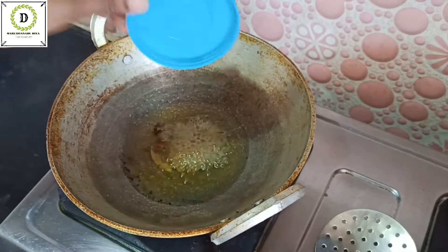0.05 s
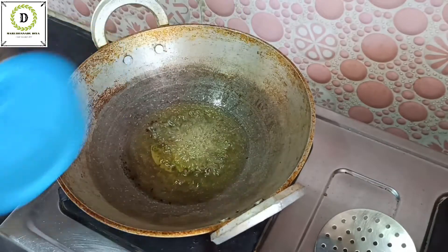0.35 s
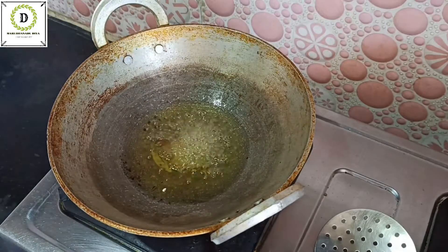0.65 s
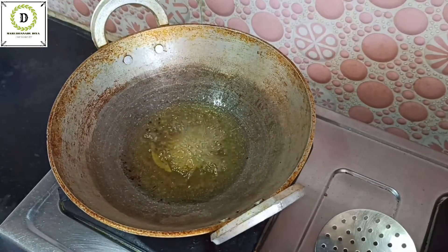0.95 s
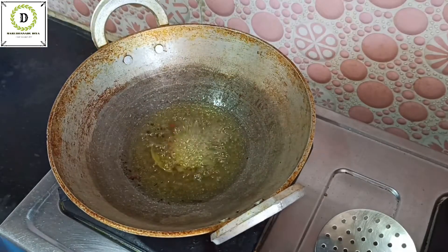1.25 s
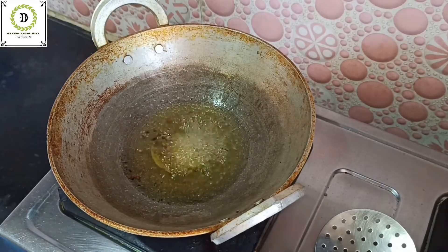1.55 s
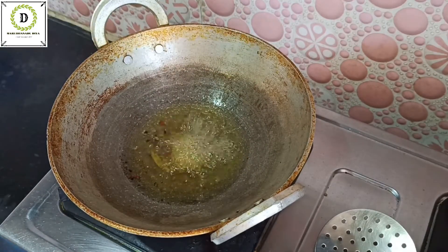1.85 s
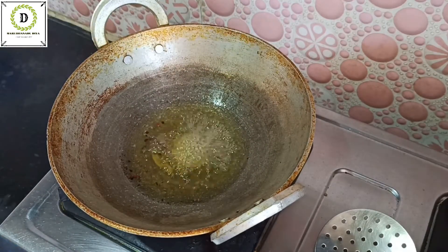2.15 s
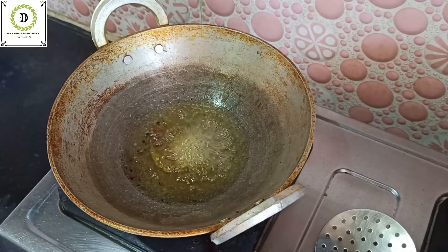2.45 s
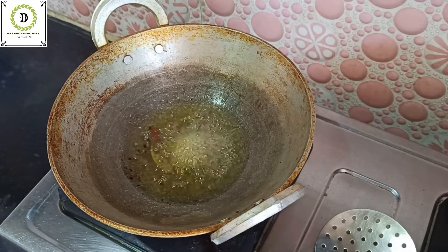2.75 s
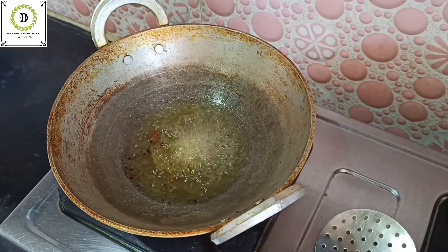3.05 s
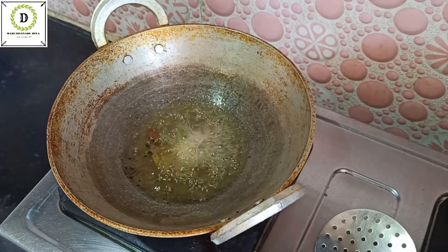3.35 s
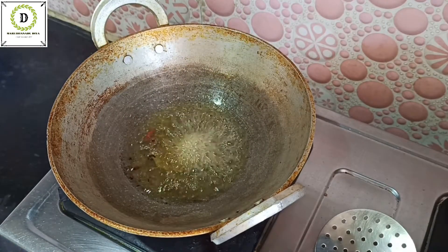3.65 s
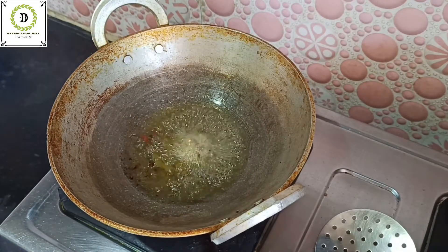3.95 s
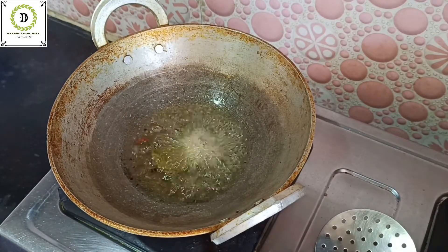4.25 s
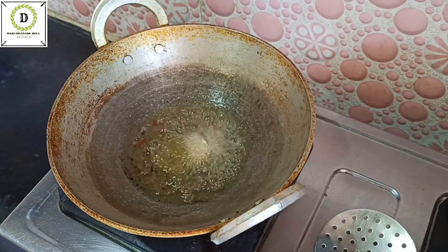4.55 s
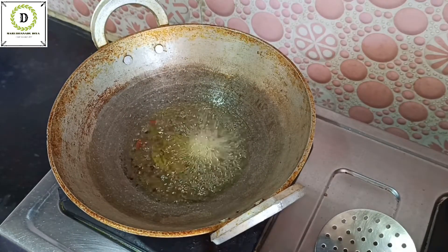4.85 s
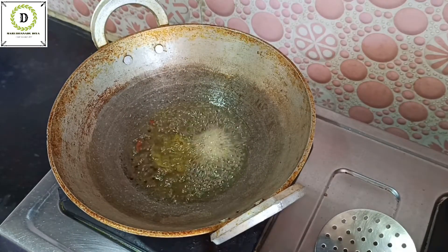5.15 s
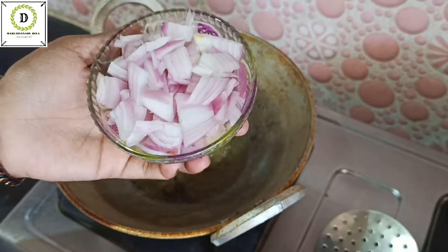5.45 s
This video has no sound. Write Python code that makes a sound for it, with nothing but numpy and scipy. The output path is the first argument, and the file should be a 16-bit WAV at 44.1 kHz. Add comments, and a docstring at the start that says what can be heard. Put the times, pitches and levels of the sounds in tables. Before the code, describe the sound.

Seeds and lentils fry in a little hot oil in a metal wok, heard close up in a small tiled kitchen with a short echo. It opens with a fine hiss of steam and a faint, low gas burner rumble. Single seeds burst on top, each sharp crack ringing the metal briefly. Around 1 second the frying falls into a lull with only scattered pops, then picks up again from about 1.5 seconds. From about 2.6 seconds small bubbles rise and the bursts crowd into a fuller, crisper crackle. Hollow plops, dull pops and a few light knocks come through near 2.6, 3.5 and 3.8 seconds, the strongest at about 4.8 seconds. The sizzle stays busy until around 5.3 seconds and eases just before the end at 5.5 seconds.

```python
"""Seeds and lentils fry in a little hot oil in a metal wok, close up in a small tiled kitchen.
It opens on a gas burner's rumble and a hiss of steam, with single seeds bursting on top; each crack
rattles round the bowl and rings the metal. After a lull near 1 s the frying picks up again.
From about 2.6 s the lentils are hot: bubbles rise, with hollow plops in the oil, dull pops and a few
light knocks, and the bursts crowd into a crackle that eases just before the end."""
import sys
import numpy as np
from scipy import signal
from scipy.fft import rfft, irfft, next_fast_len
from scipy.io import wavfile

SR = 44100
rng = np.random.default_rng(int(sys.argv[2]) if len(sys.argv) > 2 else 0)


def wav_out(sig):
    """Save sig, one row per channel (or a flat mono array), as 16-bit PCM at SR to the path in sys.argv[1]."""
    wavfile.write(sys.argv[1], SR, np.round(np.clip(np.atleast_2d(sig).T, -1, 1) * 32767).astype(np.int16))


N = 243343

# tone of the burner: frequency_hz, level_db
BURNER_COLOUR = [(25, -36), (55, -28), (68, -20), (94, -1.5), (113, -10), (135, -1.5), (157, 2.5),
                 (185, -18), (220, -19.5), (290, -7), (360, -20), (430, -20.5), (600, -22), (1100, -39.5)]
# fader ride on the burner: time_s, relative_level_db
BURNER_RIDE = [(0, -51), (.6, -52.5), (1.4, -51), (1.8, -53), (4.5, -58), (4.8, -52), (5.52, -60)]
# low booms under the pan: centre_s, half_width_s, level_db
BOOMS = [(.22, 0.14, -47), (3.5, 0.05, -44)]
# vigour of the frying, driving fizz, bubbles and crackle: time_s, relative_level_db
FRYING_RIDE = [(0, -38), (0.35, -36.5), (0.6, -42.0), (1.1, -49), (1.65, -44.5), (1.95, -36), (2.2, -33.5),
               (2.38, -47.5), (2.55, -33), (2.85, -33.5), (2.97, -38.5), (3.1, -34.5), (3.29, -41.0),
               (3.5, -28.0), (3.69, -35), (3.85, -30.0), (4.55, -30.5), (4.8, -28), (5.25, -29),
               (5.52, -36)]
# tone of the steam: frequency_hz, level_db
FIZZ_COLOUR = [(300, -19.5), (750, -5.5), (1100, -12.5), (2200, -14), (3200, -8.5), (4700, -2), (6000, -3),
               (7900, 5.5), (9500, -5), (12000, -8.5), (15000, -9)]
# hollow plops in the oil, dull pops and a few light knocks: start_s, level_db, pitch_hz
PLOP_CUES = [(0.832, -43.5, 627), (2.599, -32.5, 1350), (2.829, -43, 684), (2.948, -47, 720),
             (3.09, -44.5, 770), (3.493, -34, 1390), (3.78, -31, 2030), (3.95, -42, 910), (4.81, -26, 1990),
             (5.068, -35.5, 2020), (5.461, -43, 1210)]
# resonances of those plops, pops and knocks: pitch_hz, relative_level_db, t60_s
PLOP_RING = [(396, -6, 0.28), (708, -8, 0.037), (983, -13, 0.14), (1297, -9, 0.023), (1700, 2, 0.076),
             (1556, -9.5, 0.089), (1715, 2.5, 0.047), (2000, 2.5, 0.023), (2645, 2, 0.035)]
# modes a crack rings, against the direct sound: pitch_hz, level_db
WOK_RING = [(420, 7.5), (680, 1), (1040, -6), (1300, -1.5), (1661, -1.5), (1720, -3.5), (1862, -27),
            (2070, -0.5), (2258, -16), (2486, -8), (2659, -9), (2823, 2), (3084, 1.5), (3562, -101),
            (4357, -21), (4958, 0), (5854, -6), (6864, -53), (7973, -7)]
# tone of a bursting seed: frequency_hz, level_db
BURST_COLOUR = [(60, -84), (160, -16.5), (500, -29.5), (720, -17), (1100, -21), (1800, -7.5), (2400, -8),
                (2950, -1.5), (4300, 2.5), (5600, -1.5), (7800, 3), (9500, -7), (12000, -13), (15000, -8)]
# the featured seed bursts: start_s, level_db, pitch_hz, body_db, snap_db
SEED_CUES = [(0.0367, -26, 8100, -12, 2.0), (0.0837, -28.5, 7450, -10, 9), (0.1618, -28, 7750, -13.0, 5),
             (0.1926, -20, 3230.0, 0, 3), (0.2042, -24, 7950, 8, 6), (0.2279, -27.5, 7560, -14.0, 2),
             (0.2736, -16.5, 8600, -7, 1.5), (0.2932, -21.5, 8450, -19, -3), (0.337, -29.5, 5500, 2, -4),
             (0.3687, -26.5, 8000, -13, 5), (0.4067, -33.5, 4500, -11, 2), (0.4645, -26.5, 6000, 2.5, -9.0),
             (0.5454, -36, 7400, -11, 5), (0.6213, -33.0, 7400, -11.0, 3), (0.832, -26.5, 2870, 6.5, -8),
             (1.1477, -33.5, 7140, -7.0, -4), (1.2772, -23.5, 4040, 3.5, 3), (1.4955, -26, 5300, 4, 11),
             (1.5082, -20, 8200.0, -5, 13), (1.7296, -22.5, 7110.0, -10, 0), (1.7593, -19.5, 7740, -5, -1),
             (1.8242, -19.5, 6100, -13.0, 5.5), (1.9071, -25.0, 5830.0, 12, 14),
             (1.9184, -21.0, 3860.0, 6, -2.0), (1.9801, -28.0, 3100, 8.5, -15),
             (2.0119, -28.0, 7630.0, 5, 6.0), (2.0541, -21.5, 5400, -16, 4),
             (2.0983, -25.5, 8050.0, -8.5, 6), (2.1465, -18, 4350, -11, -5),
             (2.2264, -16.5, 6640, -1.5, 9.0), (2.4109, -23.5, 4000, -3, 11), (2.452, -28, 7800, 2.0, 13),
             (2.5084, -22, 8800, 3, 6.5), (2.5486, -14.5, 8700, -4, 2), (2.5922, -22, 3930.0, 4, 13),
             (2.6441, -21, 3860.0, -2.0, 3), (2.7347, -20, 4970.0, -2.0, 6.0), (2.7403, -21, 3060.0, 1, 3),
             (2.8278, -20, 7250, -6, 7), (2.8525, -24.5, 4080.0, -13, -1), (2.878, -24, 7110.0, -6.0, 4),
             (2.9865, -20.5, 6350, -7, 6.0), (3.0256, -23, 7800, -13, 11.0), (3.0723, -26, 6000, -6, 15.5),
             (3.1435, -23.0, 4550, -7, 6.0), (3.1743, -24, 3900, 6, 3), (3.2131, -21.5, 8800, 2, 7.5),
             (3.3356, -29, 8300, 8, 13.0), (3.3706, -23, 4150.0, 7, 3.0), (3.3937, -22.0, 3000, 10, -17),
             (3.4359, -26.5, 4080, -6, 1.0), (3.4806, -22.5, 4340, -5, 9), (3.4924, -30, 8240, 9, 11),
             (3.5309, -21.5, 4500, -2.5, 8), (3.5641, -28.5, 4600, -7.0, 4), (3.6072, -31, 7840, -4, 20),
             (3.663, -26, 8300, -2.0, 0), (3.7554, -25.5, 7700, -2.0, 19.5),
             (3.7748, -25.5, 4230.0, 11, 5.5), (3.8225, -25.5, 3120.0, -7, 5), (3.8583, -27, 7860, -12, 9),
             (3.8793, -22, 3100, -1.0, -2), (3.9355, -24.5, 7360.0, -3.0, 9),
             (3.9749, -24, 7630.0, -15, 18), (4.1255, -23.5, 2870, -5.0, -24),
             (4.1591, -29.5, 4970.0, -11, 19), (4.1693, -20.5, 4200, -19, 2), (4.2379, -18, 3230, 3, 1.5),
             (4.2913, -20, 4300.0, 3, -11.0), (4.3445, -20.5, 8150, 1, 8.5), (4.3517, -18, 8160, -11.5, 6),
             (4.3668, -22.5, 8300, 12, 4), (4.4062, -23, 7630.0, -2, 13), (4.4604, -21.5, 2830, 2, -31),
             (4.5913, -26.5, 3930.0, 11, 9), (4.6254, -23.0, 4750, 8, -5.0),
             (4.6634, -21.5, 2930, -4.0, -2), (4.7745, -19.5, 4200, 5, -30), (4.8035, -16, 2940, 3, -7),
             (4.8104, -26, 4080.0, 12, -4), (4.844, -24, 3290.0, -1, -2),
             (4.9196, -24.5, 3660.0, -2.0, -11), (4.9346, -18, 4100, -6.0, 1),
             (4.942, -22, 7770.0, -12, -1), (5.0141, -18, 4670, -2.0, -10), (5.0565, -17.5, 2950.0, 6, 2),
             (5.0956, -20, 5160, -1, 0.0), (5.1181, -18, 4500, -12, -3), (5.1861, -15, 3980, -6, -6),
             (5.2953, -22, 4350, -4.0, -1), (5.3154, -19, 5100, -6, 1), (5.3646, -21.0, 3930, -8, -4),
             (5.3897, -27.5, 8150, 6, 22), (5.4613, -26.0, 3100, 2, -24), (5.4754, -26, 7840, -7, 8)]
# brief dips in the whole mix: centre_s, half_width_s, depth_db
MIX_DIPS = [(1.485, 0.0075, -5.5), (2.396, 0.015, -6.5)]

SIMMER_DB = -34.5  # the frying ride at a steady simmer
HOT_S, HEATING_S = 2.62, 0.22  # when half the lentils are hot, and how quickly the rest follow


def undb(db):
    """Decibels to gain."""
    return 10 ** (np.asarray(db) / 20)


def ride(table, times):
    """Read a level curve at the given times."""
    return np.interp(times, *np.transpose(table))


def colour(points, hz):
    """An EQ curve in dB, read on a log-frequency axis."""
    f, db = np.transpose(points)
    return np.interp(np.log(hz + 1), np.log(f), db)


def bins(size):
    """Frequencies of a real transform."""
    return np.arange(size // 2 + 1) * SR / size


def causal(db):
    """Minimum-phase EQ: sharp attack, ringing after it."""
    cepstrum = irfft(np.log(undb(db)))
    half = cepstrum.shape[-1] // 2
    cepstrum[..., 1:half] *= 2
    cepstrum[..., half + 1:] = 0
    return np.exp(rfft(cepstrum))


def tint(x, points):
    """Give a signal a colour and an rms of one."""
    size = 2 * next_fast_len(N // 2 + 2048)
    y = irfft(rfft(x, size) * causal(colour(points, bins(size))))[:N]
    return y / np.std(y)


def unit(x):
    """Scale to an energy of one."""
    return x / np.sqrt(np.sum(x ** 2, axis=-1, keepdims=True))


def bell(hz, centre_hz, half_width_octaves):
    """A bell curve in pitch, one at its peak."""
    return 1 / (1 + (np.log2(hz / centre_hz) / half_width_octaves) ** 2)


def place(times, sounds):
    """Lay one-shots on the timeline."""
    out = np.zeros(N + sounds.shape[1])
    for start_s, sound in zip(times, sounds):
        i = int(np.clip(start_s * SR, 0, N - 1))
        out[i:i + len(sound)] += sound
    return out[:N]


def vigour(times):
    """How far the frying is above a steady simmer, in dB."""
    return ride(FRYING_RIDE, times) - SIMMER_DB


def hot(times):
    """Share of the lentils that are hot right through, 0 to 1."""
    return .5 + .5 * np.tanh((times - HOT_S) / HEATING_S)


def kitchen(x, t60_s=0.22, wet_db=-6.5, build_s=0.0013, dull_hz=9000, treble_share=0.72):
    """Tiled walls answer within milliseconds; the treble dies first."""
    t = np.arange(SR // 2) / SR
    noise = rng.standard_normal(len(t))
    low = signal.sosfiltfilt(signal.butter(2, dull_hz, fs=SR, output="sos"), noise)
    fade = np.exp(-np.log(1000) * t / t60_s)
    attack = 1 - np.exp(-(t / build_s) ** 2)
    tail = (low * fade + (noise - low) * fade ** (1 / treble_share)) * attack
    return undb(wet_db) * signal.fftconvolve(x, unit(tail))[:N]


def burner(gain_db=3.5, boom_hz=101.6, boom_q=8):
    """The gas flame rumbles under the wok and twice swells into a low boom."""
    t = np.arange(N) / SR
    rumble = tint(rng.standard_normal(N), BURNER_COLOUR) * undb(ride(BURNER_RIDE, t) + gain_db)
    boom = signal.lfilter(*signal.iirpeak(boom_hz, boom_q, fs=SR), rng.standard_normal(N))
    swells = sum(undb(db) * np.exp(-((t - s) / width) ** 2) for s, width, db in BOOMS)
    return rumble + boom / np.std(boom) * swells


def fizz(per_s=9000, spread_db=3.5, simmer_db=-41, level_slope=0.39, damp_db=6, damp_s=0.12):
    """A bed of tiny steam bubbles breaking, with extra hiss at first while the seeds are damp."""
    t = np.arange(N) / SR
    ticks = (rng.random(N) < per_s / SR) * rng.choice([-1, 1], N)
    accents = undb(spread_db * np.minimum(rng.exponential(size=N), 5))
    level_db = simmer_db + level_slope * vigour(t) + damp_db * np.exp(-t / damp_s)
    return tint(ticks * accents, FIZZ_COLOUR) * undb(level_db)


def bubbles(per_s=260, low_hz=700, high_hz=5500, cycles=9, glide=0.032,
            scatter_db=2, tilt_db_per_octave=6.5, simmer_db=-33, level_slope=0.56):
    """Once the lentils are hot, bigger bubbles ring briefly and bend up in pitch as they surface."""
    t = np.arange(SR // 20) / SR
    count = int(per_s * N / SR)
    when, smallness, strength = rng.random((count, 3)).T[:, :, None]
    start_s = when * N / SR
    hz = low_hz * (high_hz / low_hz) ** smallness
    decay_s = cycles / hz / np.pi
    bend = 1 + glide * (1 - np.exp(-t / decay_s / 2))
    phase = 2 * np.pi * np.cumsum(hz * bend, axis=1) / SR
    db = simmer_db + level_slope * vigour(start_s) + tilt_db_per_octave * np.log2(hz / high_hz)
    db += scatter_db * np.minimum(-np.log(1 - strength), 3)
    return place(start_s[:, 0], hot(start_s) * undb(db) * np.exp(-t / decay_s) * np.sin(phase))


def plops_and_pops(reach_octaves=0.17, puff_db=-3, puff_s=0.009, span_s=0.025):
    """Hollow plops in the oil, dull pops and a few light knocks: a short ring on a puff of noise."""
    t = np.arange(SR // 3) / SR
    hz, db, t60 = np.transpose(PLOP_RING)[:, :, None]
    sounds = []
    for _, level_db, pitch_hz in PLOP_CUES:
        envelopes = undb(db) * bell(hz, pitch_hz, reach_octaves) * np.exp(-np.log(1000) * t / t60)
        detune = 1 + 0.0089 * rng.standard_normal(hz.shape)
        tones = np.sin(2 * np.pi * hz * detune * t) * rng.choice([-1, 1], hz.shape)
        ring = np.sum(envelopes * tones, axis=0)
        noise = rng.standard_normal(len(t)) * np.exp(-t / puff_s)
        puff = signal.lfilter(*signal.iirpeak(pitch_hz, Q=3, fs=SR), noise)
        plop = unit(unit(ring) + undb(puff_db) * unit(puff))
        sounds.append(plop * undb(level_db) * np.sqrt(span_s * SR))
    return place([row[0] for row in PLOP_CUES], np.array(sounds))


def wok(x, width_hz=32):
    """The metal bowl, damped by the oil, adds a short ring to every crack."""
    t = np.arange(SR // 4) / SR
    fade = np.exp(-np.pi * width_hz * t)
    ring = sum(undb(db) * np.cos(2 * np.pi * hz * t) for hz, db in WOK_RING) * 2 * fade / fade.sum()
    return x + signal.fftconvolve(x, ring)[:N]


def crackle_cues(simmer_per_s=75, doubling_db=6, simmer_db=-36, level_slope=1.12, slot_s=0.001):
    """Small seeds pop at random: thicker and louder as the frying quickens, fuller and crisper hot."""
    slots = np.arange(0, N / SR, slot_s)
    chance, draws = rng.random(len(slots)), rng.standard_normal((len(slots), 4))
    per_s = simmer_per_s * 2 ** (vigour(slots) / doubling_db)
    fired = chance < per_s * slot_s
    start_s = slots[fired]
    size, pitch, body, snap = draws[fired].T
    level_db = simmer_db + level_slope * vigour(start_s) + 3 * np.minimum(size, 1.5)
    pitch_hz = 4400 * 2 ** (.6 * pitch)
    # tone moves from its cool setting to its hot one, scattered seed by seed
    body_db = np.interp(hot(start_s), [0, 1], [-9, 3]) + 4 * body
    snap_db = np.interp(hot(start_s), [0, 1], [-5, -2]) + 6 * snap
    return np.transpose([start_s, level_db, pitch_hz, body_db, snap_db])


def seed_bursts(cues, rattle_db=5, bowl_s=0.0038, hob_s=0.0085, hob_db=-12,
                husk_db=6, second_db=5, husk_octaves=.18,
                body_low_hz=520, body_high_hz=2300, snap_hz=9300, span_s=0.0069):
    """A husk splits with a crack and a spit of steam, which bounce round the bowl and off the hob."""
    start_s, level_db, pitch_hz, body_db, snap_db = np.transpose(cues)[:, :, None]
    size = 2048
    t, hz = np.arange(size) / SR, bins(size) + 1
    noise = rng.standard_normal((len(cues), size))
    # dry seeds snap hard and short; moist ones spit for longer
    moist = 2 ** (0.47 * noise[:, -1:] - snap_db / 18)
    spit = noise * (np.exp(-t / (bowl_s * moist)) + undb(hob_db) * np.exp(-t / hob_s))
    crack = (t == 0) + undb(rattle_db) * moist * unit(spit)
    # each husk has its own pitch and a weaker, random second resonance
    second_hz = 5000 * 2 ** (.5 * noise[:, -2:-1])
    husk_eq = husk_db * bell(hz, pitch_hz, husk_octaves) + second_db * bell(hz, second_hz, husk_octaves)
    # big seeds add body, dry ones treble
    lows = 1 / (1 + (hz / body_high_hz) ** 12)
    highs = 1 / (1 + (snap_hz / hz) ** 10)
    body_eq = body_db * lows / (1 + (body_low_hz / hz) ** 2)
    spectrum = rfft(crack) * causal(colour(BURST_COLOUR, hz) + husk_eq + body_eq + snap_db * highs)
    # the cue level sets the energy of the mids, as an rms over span_s
    mids = irfft(spectrum * (1 - lows - highs))
    mids_rms = np.sqrt(np.sum(mids ** 2, axis=1, keepdims=True) / (span_s * SR))
    return place(start_s[:, 0], irfft(spectrum) * undb(level_db) / mids_rms)


def scene(seed_spots=8):
    """Mono mix: bursts, bubbles, fizz and plops in the wok and the room, over the burner."""
    cues = np.vstack([SEED_CUES, crackle_cues()])
    # seeds lie at different spots in the oil, and each spot has its own echoes
    seeds = [seed_bursts(cues[k::seed_spots]) for k in range(seed_spots)]
    steam = bubbles() + fizz()
    frying = wok(sum(layer + kitchen(layer) for layer in seeds + [steam]))
    plops = plops_and_pops()
    mix = frying + plops + kitchen(plops) + burner()
    t = np.arange(N) / SR
    dips_db = sum(db * np.exp(-((t - s) / width) ** 4) for s, width, db in MIX_DIPS)
    return (mix * undb(dips_db))[None]


def record(dry, ceiling=.92, top_hz=15600):
    """The microphone rounds the sharpest cracks, and a steep low-pass takes off the top."""
    rounded = ceiling * np.tanh(dry / ceiling)
    return signal.sosfilt(signal.ellip(10, .2, 70, top_hz, fs=SR, output="sos"), rounded)


dry = scene()
out = record(dry)
wav_out(out)
```